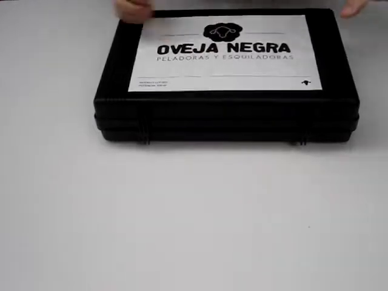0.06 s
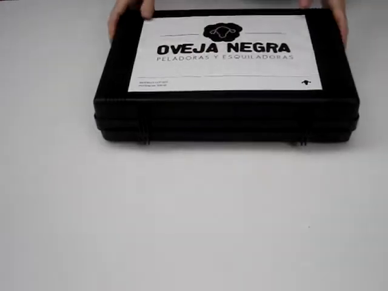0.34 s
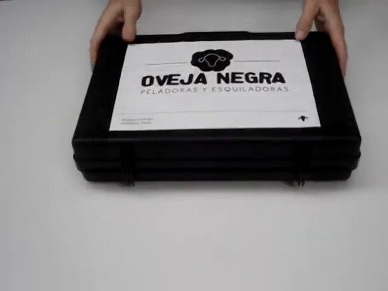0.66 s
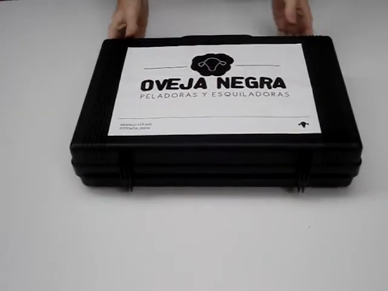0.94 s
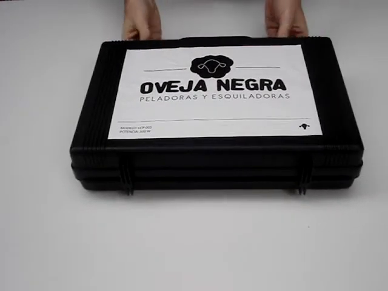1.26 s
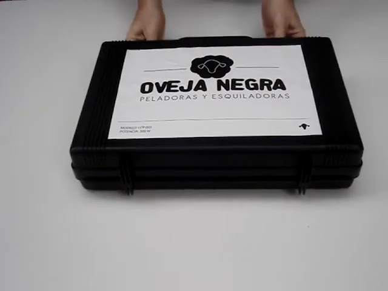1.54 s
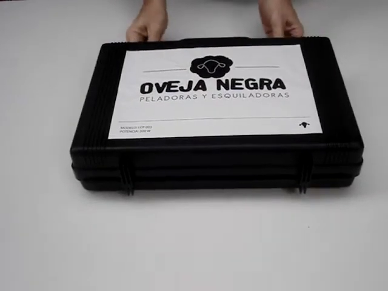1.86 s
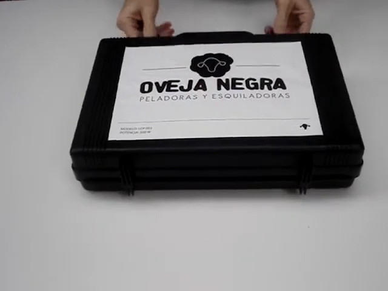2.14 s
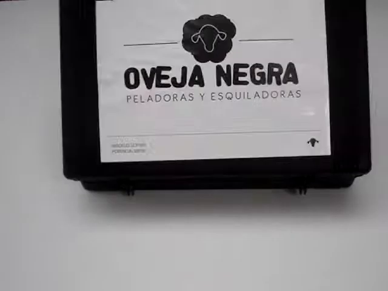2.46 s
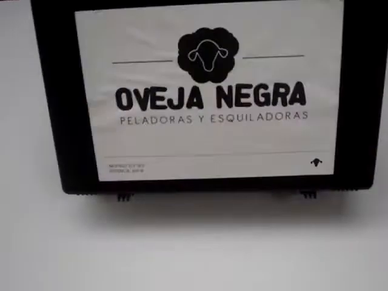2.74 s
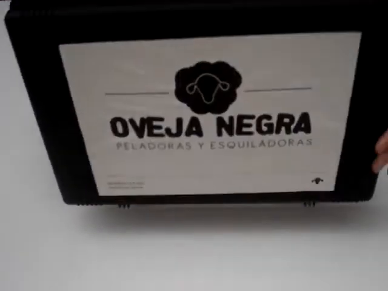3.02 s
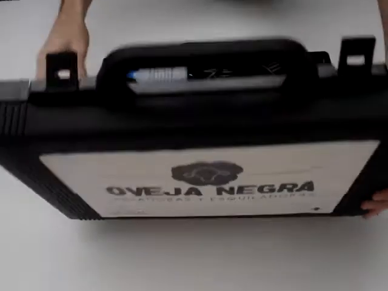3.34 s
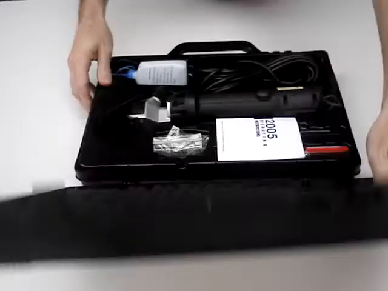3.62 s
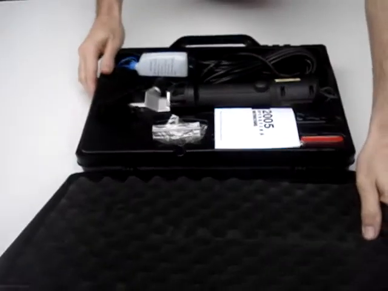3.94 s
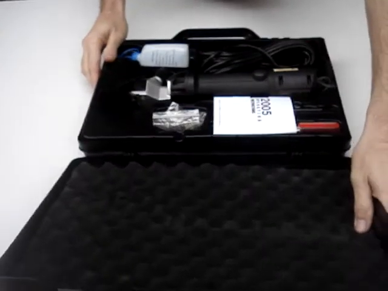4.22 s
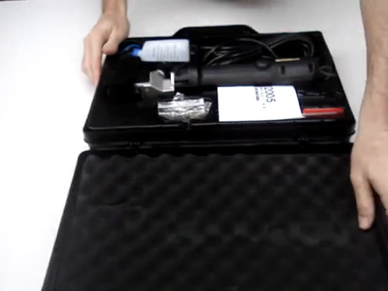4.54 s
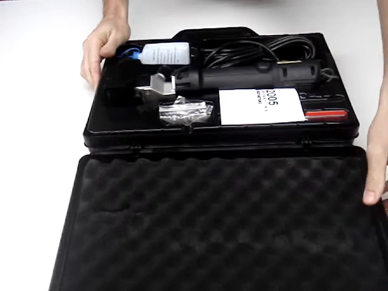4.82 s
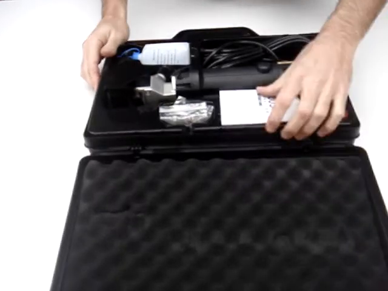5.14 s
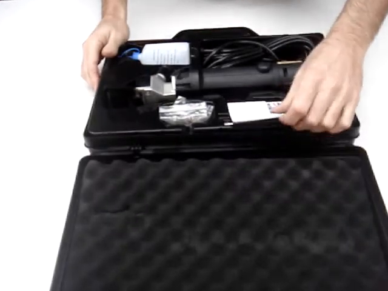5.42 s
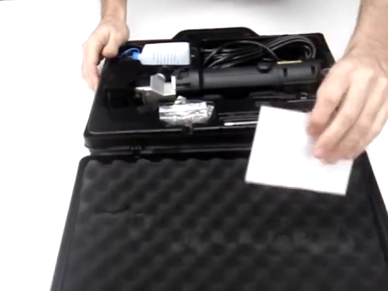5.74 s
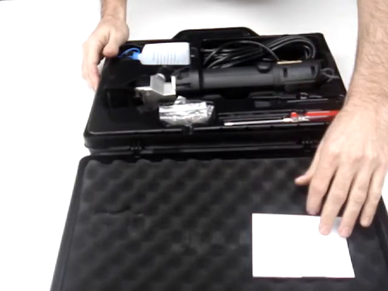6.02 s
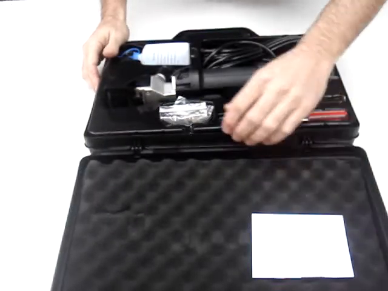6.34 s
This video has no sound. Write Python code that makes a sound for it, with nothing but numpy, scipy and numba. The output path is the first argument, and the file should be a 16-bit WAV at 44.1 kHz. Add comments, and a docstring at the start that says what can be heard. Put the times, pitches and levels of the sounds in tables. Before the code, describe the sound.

A hollow plastic case is bumped and pulled across a table with a soft scrape. Fingers brush and tap it, then the latches snap open in a loud, bright cluster of clacks. After a pause the lid ticks, swings over and settles with another clack and a dull knock. A paper leaflet rustles faintly and gives a brief squeak. A small microphone picks up soft hiss and the short echo of a bare room.

```python
"""A hard plastic carry case is pulled across a table, unlatched, and its lid swung over and laid down.
Every clack and knock rings the same hollow shell in a bare room. In between, hands, lid, hinge and
a paper leaflet rub and rustle, each rub made of many tiny slips. Behind it all is a soft hiss.
A small mono microphone with gain control flattens the loudest clack."""
import sys
import numpy as np
from scipy import signal
from scipy.fft import rfft, irfft
from scipy.io import wavfile
from numba import njit

SR = 44100
rng = np.random.default_rng(int(sys.argv[2]) if len(sys.argv) > 2 else 0)


def transcribe(signal):
    """Save signal, clipped to [-1, 1], as a 16-bit WAV file at the path in sys.argv[1]."""
    frames = np.atleast_2d(signal).T
    limited = np.clip(frames, -1, 1)
    pcm = np.round(limited * 32767).astype(np.int16)
    wavfile.write(sys.argv[1], SR, pcm)


N = 281382
T = np.arange(N) / SR
RING = T[:2 ** 15]  # time for one blow to die away

# the notes the hollow case rings at: f/Hz, level/dB, time to fade by 60 dB/s
SHELL_NOTES = [(116.3, -19, 0.27), (184, -3.5, 0.074), (247.8, 0.5, 0.23), (296.5, 1, 0.078),
               (333.4, -2.5, 0.13), (483, -9.5, 0.13), (559.4, -6, 0.15), (592, -11, 0.088),
               (663, 2, 0.039), (733, -5, 0.06), (818, -13, 0.22), (975, -1.5, 0.12), (1068, -14.5, 0.32),
               (1127, -11, 0.14), (1280, -8, 0.21), (1373, -7.5, 0.19), (1504, -8, 0.15), (1518, -9, 0.13),
               (1837, -9.5, 0.17), (2006, -9.5, 0.22), (2254, 2.5, 0.063), (2470, -14, 0.087),
               (2620, -18, .25), (2825, -12, 0.28)]

def shell(crack, crack_s, spike, ring_db, room_db):
    """One blow on the case: a sharp spike, a crack of many short notes, the main notes and their echo."""
    hz, db, fade_s = np.transpose(SHELL_NOTES)[:, :, None]
    t = RING[:SR // 3]
    # where the blow lands decides which way each note swings first
    weight = undb(db + ring_db) * rng.choice([-1, 1], hz.shape)
    notes = weight * np.sin(2 * np.pi * hz * t) * np.exp(-np.log(1000) * t / fade_s)
    blow = np.zeros(len(RING))
    add(blow, 0, notes.sum(axis=0))
    blow[0] += spike
    burst = crack * rng.standard_normal(len(RING)) * np.exp(-RING / crack_s)
    walls = signal.fftconvolve(blow, echo())[:len(RING)]
    walls += np.linalg.norm(burst) * echo()  # the crack reaches the walls as one even burst
    return blow + burst + undb(room_db) * walls

# latches and lid rim snapping: t/s, level/dB, brightness/Hz, echo/dB, air puff/dB
RIM_CLACKS = [(1.8426, -7.5, 3200, -18, -20.5), (1.8530, -6, 5140, -3, -46), (1.8620, -13, 5540, 4.5, -42),
              (1.8826, -10.5, 4500, -3, -33), (1.897, -15, 4470, 0.5, -27),
              (4.4592, -19.5, 4400, -2.5, -26), (4.4725, -24.5, 5500, -2.5, -40)]
# their tone: f/Hz, level/dB
CLACK_TONE = [(60, -14), (120, 2), (185, -0.5), (250, -1), (350, 2), (700, 5.5), (1500, 5), (3000, 3),
              (3900, -0.5), (5200, 0), (7000, -7), (10000, -20.5)]

def clacks():
    """Hard hits on the stiff rim crack brightly and push a little air."""
    out = np.zeros(N)
    for s, db, bright_hz, room_db, air_db in RIM_CLACKS:
        hit = shell(crack=10.2, crack_s=0.014, spike=85, ring_db=-2.0, room_db=room_db)
        hit = cut(colour(hit, CLACK_TONE), bright_hz, "low", order=1)
        add(out, s, start_at(hit, db) + puff(air_db))
    return out

# bumps of hands, shell and contents: t/s, level/dB, brightness/Hz, bass cut/Hz, panel ring/dB
DULL_KNOCKS = [(0.0527, -23, 262, 201, 11), (0.0536, -25.5, 990, 690, 0), (0.4260, -32.5, 557, 128, -5),
               (1.0520, -38, 420, 238, 9), (1.3180, -39.5, 800, 600, 10), (1.3760, -41, 995, 500, 13),
               (1.5148, -30.5, 374, 323, 3), (2.0641, -26.5, 750, 223, 5.5), (2.2700, -38, 900, 350, 10),
               (2.5761, -40.5, 450, 754, -2), (2.893, -37.5, 347, 475, 9), (3.8475, -32, 1080, 252, 13),
               (3.8535, -34.5, 600, 250, 9), (3.9250, -31.5, 550, 270, 3), (3.948, -42, 600, 300, 6),
               (4.5776, -22, 716, 335, 3), (4.7720, -42.5, 1200, 500, 5), (5.1625, -39, 700, 650, -3),
               (5.591, -41, 1600, 900, -2), (5.5975, -33, 474, 514, 5), (5.6920, -41.5, 1320, 1410, -2),
               (6.0340, -43.5, 450, 252, 2)]

def knocks():
    """Soft hits ring the panels more and lose their treble, gently at first and then steeply."""
    out = np.zeros(N)
    for s, db, bright_hz, low_hz, ring_db in DULL_KNOCKS:
        hit = shell(crack=12.5, crack_s=0.0059, spike=114, ring_db=ring_db, room_db=-7.5)
        hit = cut(hit, low_hz, "high", order=3)
        hit = cut(hit, bright_hz, "low", order=1)
        hit = cut(hit, 2.36 * bright_hz, "low")
        add(out, s, start_at(hit, db))
    return out

# the lid's edge ticking: t/s, level/dB, fade time/s, air puff/dB
LID_TICKS = [(3.8278, -22, 0.0047, -50), (3.8327, -21, 0.0041, -26.5)]
# its tone: f/Hz, level/dB
TICK_TONE = [(200, -15), (700, -7), (1400, -3), (3200, 7), (4800, -6.5), (6300, 1.5), (10000, -15)]

def ticks():
    """Bright, dry scratches, too close to the microphone to wake the room."""
    out = np.zeros(N)
    for s, db, fade_s, air_db in LID_TICKS:
        scratch = unit(colour(rng.standard_normal(len(RING)), TICK_TONE)) * np.exp(-RING / fade_s)
        add(out, s, undb(db) * scratch + puff(air_db))
    return out

def puff(db, rise_s=0.0033):
    """A bending panel shoves one slow puff of air."""
    shove = RING / rise_s * np.exp(1 - RING / rise_s)
    return undb(db) * cut(shove, 14, "high", order=1)

def rub(strokes, tone, slips_per_s, rise, fall):
    """Rubbing is many tiny, uneven slips. Each stroke swells and fades over shares of its length."""
    slips = (rng.random(N) < slips_per_s / SR) * rng.standard_normal(N)
    pressure = np.zeros(N)
    for s, length_s, db in strokes:
        done = (T - s) / length_s
        ramp = np.clip(np.minimum(done / rise, (1 - done) / fall), 0, 1)
        pressure += undb(db) * np.sin(np.pi / 2 * ramp) ** 2
    return unit(colour(slips, tone)) * pressure * undb(wander(per_s=50))  # wavers by about 1 dB

# one long pull, then a nudge: t/s, length/s, level/dB
PULLS = [(.43, 0.51, -33), (.9, 0.31, -45.5)]
# their tone: f/Hz, level/dB
FEET_TONE = [(150, -24), (280, -2), (430, -9), (720, -4.5), (850, -2), (1050, -4.5), (1330, 0.5),
             (1720, -3.5), (2220, -3.5), (3200, -9), (5900, -13), (8000, -17.5), (10000, -28)]

def feet():
    """The case's feet scrape over the table."""
    return rub(PULLS, FEET_TONE, slips_per_s=12000, rise=0.45, fall=0.58)

# the case coming open: t/s, length/s, level/dB
PARTING = [(2.16, .24, -39)]
# its tone: f/Hz, level/dB
SEAM_TONE = [(150, -12), (250, 2.5), (600, -0.5), (950, -2), (1300, -18), (2000, -8.5), (5000, -18.5),
             (9000, -34)]

def seam():
    """The two halves rub as they come apart."""
    return rub(PARTING, SEAM_TONE, slips_per_s=1000, rise=0.48, fall=0.63)

# the lid settling: t/s, length/s, level/dB
SETTLING = [(3.855, .43, -40.5)]
# its tone: f/Hz, level/dB
LID_TONE = [(150, -17), (310, 1.5), (410, 0.5), (600, -1), (1020, 0), (2370, -9.5), (4000, -10.5),
            (6500, -19.5), (10000, -34)]

def lid():
    """The open lid slides to rest."""
    return rub(SETTLING, LID_TONE, slips_per_s=4000, rise=0.05, fall=0.5)

# the hinge moving: t/s, length/s, level/dB
TURNS = [(4.1, .4, -45), (4.32, 0.17, -42)]
# its tone: f/Hz, level/dB
HINGE_TONE = [(150, -8), (260, -2), (450, -2.5), (680, 5.5), (820, -7), (950, 1), (1700, -5.5), (2200, -8),
              (2950, -15.5), (9000, -31.5)]

def hinge():
    """The hinge rubs through its last few degrees."""
    return rub(TURNS, HINGE_TONE, slips_per_s=2100, rise=0.31, fall=0.62)

# fingers on the plastic: t/s, length/s, level/dB
TOUCHES = [(1.2, .12, -40.5), (1.325, 0.14, -41.5)]
# their tone: f/Hz, level/dB
FINGER_TONE = [(200, -25), (340, -2.5), (490, -6), (650, 4.5), (800, -5.5), (1250, -7.5), (2080, -2.5),
               (3000, -15), (5000, -24), (9000, -40)]

def fingers():
    """Fingers brush the case, feeling for the latches."""
    return rub(TOUCHES, FINGER_TONE, slips_per_s=5800, rise=0.27, fall=0.42)

# palms on the plastic: t/s, length/s, level/dB
GRIPS = [(0, 0.21, -45.5), (.18, 0.37, -45), (.46, 0.24, -44.5)]
# their tone: f/Hz, level/dB
PALM_TONE = [(200, -4.5), (500, -5.5), (900, 1), (1100, -2.5), (1300, 3), (1700, 0), (2000, -8.5),
             (2600, -11.5), (3200, -14), (5000, -19.5), (9000, -35)]

def palms():
    """Palms rub the sides as they take hold."""
    return rub(GRIPS, PALM_TONE, slips_per_s=4000, rise=0.1, fall=0.31)

# the grip whistling: t/s, length/s, level/dB
WHISTLES = [(.03, .34, -58.5), (.2, 0.73, -51), (.66, 0.93, -58)]
# its tone: f/Hz, level/dB
WHISTLE_TONE = [(2000, -38), (2580, -5), (2750, 8), (2930, 3), (3080, -34), (3700, -41)]

def whistle():
    """The grip rubs in one narrow range of pitch, making a thin whistle."""
    return rub(WHISTLES, WHISTLE_TONE, slips_per_s=5100, rise=0.19, fall=0.34)

# the leaflet flicking and squeaking: t/s, f/Hz, level/dB, length/s, roughness/0-1
PAPER_SQUEAKS = [(5.307, 2590, -40.5, 0.0084, 0.45), (6.0117, 1830, -36, .0012, 0.7),
                 (6.0157, 1635, -29, 0.00093, 0.7), (6.0195, 1450, -25, 0.00039, 0.25),
                 (6.0211, 1722, -26.5, 0.0016, 0.84)]

def squeaks():
    """Paper sticks and slips under a fingertip for a few uneven cycles."""
    out = np.zeros(N)
    t = RING[:SR // 10] - 1 / 20  # zero is the squeak's loudest moment
    for s, hz, db, length_s, rough in PAPER_SQUEAKS:
        wobble = unit(cut(rng.standard_normal(len(t)), 340, "low"))
        cycles = np.cumsum(hz * (1 + rough * wobble / 10)) / SR
        swell = undb(db) * np.exp(-.5 * (t / length_s) ** 2)
        add(out, s + t[0], swell * np.sin(2 * np.pi * cycles))
    return out

# the leaflet moving: t/s, length/s, level/dB
RUSTLES = [(5.17, 0.44, -49.5), (5.5, 0.25, -57)]
# its tone: f/Hz, level/dB
PAPER_TONE = [(300, 5), (650, 6.5), (1300, -2), (2700, -1.5), (4000, -12), (7000, -11.5), (10000, -25)]

def leaflet():
    """Paper rustles as it is gripped, then drawn out."""
    return rub(RUSTLES, PAPER_TONE, slips_per_s=2700, rise=0.22, fall=0.49)

# the tone of the bare walls: f/Hz, level/dB
ECHO_TONE = [(60, 0.5), (200, -1.5), (500, -2), (1500, -2.5), (5000, 0), (10000, 6)]
# how long they echo: f/Hz, time to fade by 60 dB/s
ECHO_FADE = [(100, 0.61), (300, 0.55), (1000, 0.59), (3000, 0.61), (6000, 0.53), (10000, 0.3)]

def echo(build_s=0.013):
    """The room's answer to one click: reflections thicken, then fade, the treble first."""
    hz = np.fft.rfftfreq(len(RING), 1 / SR)
    spectrum = rfft(rng.standard_normal(len(RING))) * undb(look_up(hz, ECHO_TONE))
    band_hz = np.geomspace(80, 10000, 7)
    shares = np.array([look_up(hz, np.c_[band_hz, row]) for row in np.eye(len(band_hz))])
    bands = irfft(spectrum * shares, len(RING))
    fades = np.exp(-np.log(1000) * RING / look_up(band_hz, ECHO_FADE)[:, None])
    tail = np.sum(bands * fades, axis=0) * (1 - np.exp(-(RING / build_s) ** 2))
    return tail / np.linalg.norm(tail)

def room(x, db):
    """The part of a sound that bounces back from the walls."""
    return undb(db) * signal.oaconvolve(x, echo())[:N]

# the tone of room air and microphone hiss: f/Hz, level/dB
AIR_TONE = [(15, -49), (25, -21), (92, 0), (137, -2.5), (209, -5.5), (237, -10), (255, -4), (311, -4.5),
            (464, -9), (500, -7), (692, -7.5), (1090, -9), (3020, -22.5), (8000, -29.5), (9770, -34.5),
            (12700, -82), (21500, -120)]

def air(hiss_db=-47, whine_hz=7900, whine_db=-75):
    """Steady room noise with a faint, flickering high tone."""
    hiss = unit(colour(rng.standard_normal(N), AIR_TONE)) * undb(hiss_db)
    whine = np.sin(2 * np.pi * np.cumsum(whine_hz + 25 * wander(per_s=30)) / SR)
    return hiss + whine * undb(whine_db + 3.6 * wander(per_s=9))

def undb(db):
    """Turn decibels into a number to multiply by."""
    return 10 ** (np.asarray(db) / 20)

def unit(x):
    """Scale a sound to an average (rms) level of 1."""
    return x / np.sqrt(np.mean(x ** 2))

def start_at(x, db):
    """Scale a sound so its first hundredth of a second has this level."""
    return x * undb(db) / np.sqrt(np.mean(x[:SR // 100] ** 2))

def look_up(hz, points):
    """Read between a table's rows, with every octave equally wide."""
    f, value = np.transpose(points)
    return np.interp(np.log(np.maximum(hz, 1)), np.log(f), value)

def colour(x, tone, size=4096):
    """Make each pitch range louder or softer, as a tone table says."""
    gains = undb(look_up(np.fft.rfftfreq(size, 1 / SR), tone))
    folded = irfft(np.log(gains))
    # fold the filter forward in time, so nothing rings before the sound starts
    folded[1:size // 2] *= 2
    folded[size // 2 + 1:] = 0
    return signal.oaconvolve(x, irfft(np.exp(rfft(folded))))[:len(x)]

def cut(x, hz, keep, order=2):
    """Keep the "low" or "high" side of hz; a higher order cuts more steeply."""
    return signal.sosfilt(signal.butter(order, min(hz, SR / 2 - 1), keep, fs=SR, output="sos"), x)

def wander(per_s):
    """Glide between random values, mostly from -1 to 1."""
    values = rng.standard_normal(512)
    return np.interp(T * per_s, np.arange(len(values)), values)

def add(track, s, x):
    """Mix x into the track from time s."""
    i = int(s * SR)
    track[i:i + len(x)] += x[:N - i]

def scene():
    """Everything reaches one microphone, directly and for the most part by the walls too."""
    rubbing = palms() + whistle() + feet() + fingers() + seam() + lid() + hinge() + leaflet()
    paper = squeaks()
    mono = clacks() + knocks() + ticks() + rubbing + paper
    mono += room(rubbing, db=-6) + room(paper, db=-17) + air()
    return np.array([mono, mono])

@njit
def follow(x, attack, release):
    """Track the loudness, rising fast and falling slowly."""
    out, level = np.empty(len(x)), 0.
    for i in range(len(x)):
        level += (abs(x[i]) - level) * (attack if abs(x[i]) > level else release)
        out[i] = level
    return out

def record(dry, limit=0.47, attack_s=0.0023, release_s=0.053, ceiling=0.68, top_hz=10000):
    """Gain control holds the loudest clack down, peaks round off, and the highest treble is cut."""
    loudness = follow(dry[0], 1 / (attack_s * SR), 1 / (release_s * SR))
    held = dry * limit / np.maximum(loudness, limit)
    rounded = ceiling * np.tanh(held / ceiling)
    return signal.sosfilt(signal.ellip(10, .2, 70, top_hz, fs=SR, output="sos"), rounded)

dry = scene()
out = record(dry)
transcribe(out)
```